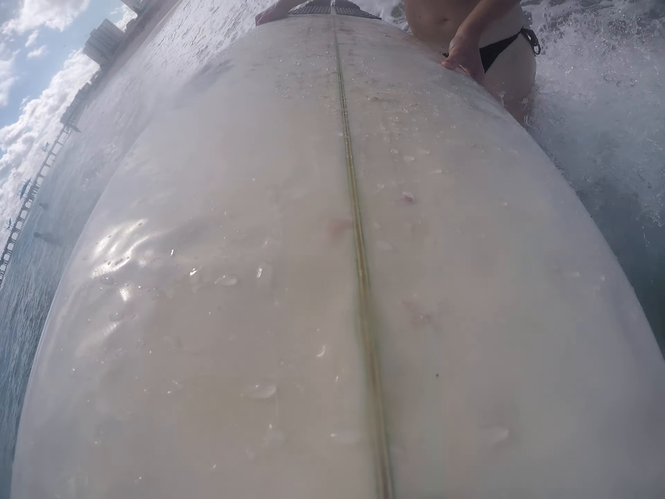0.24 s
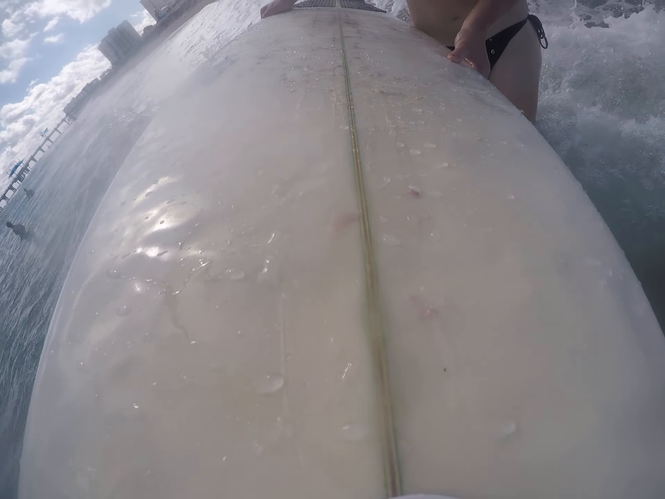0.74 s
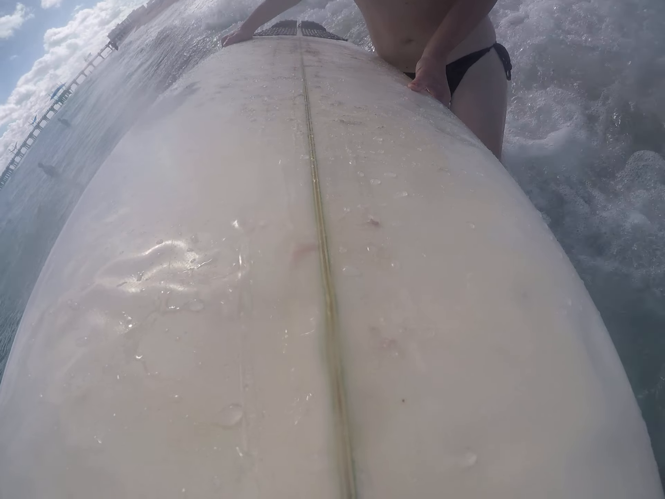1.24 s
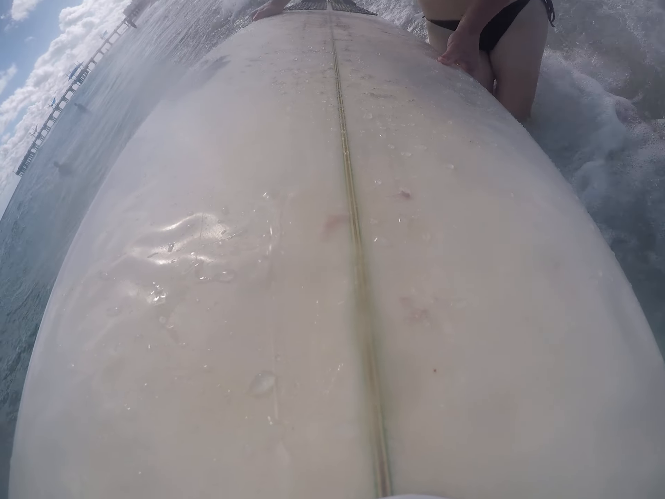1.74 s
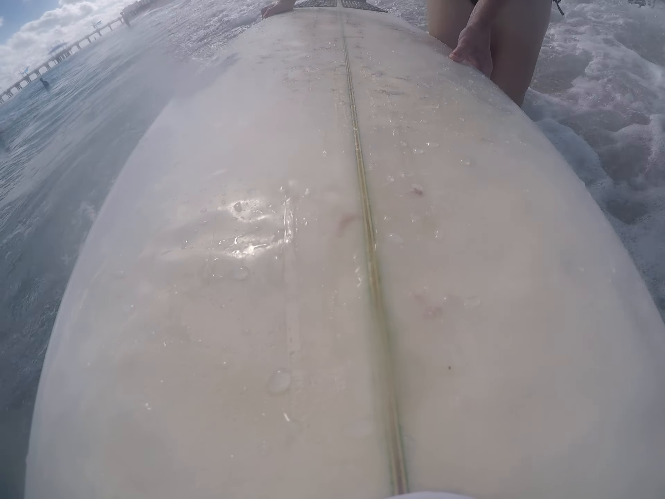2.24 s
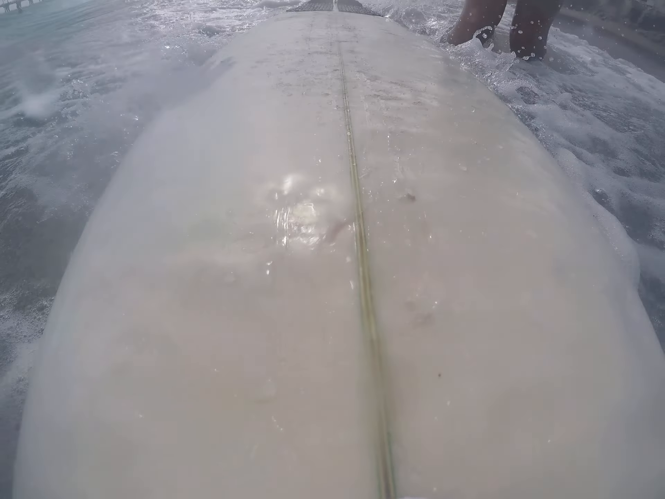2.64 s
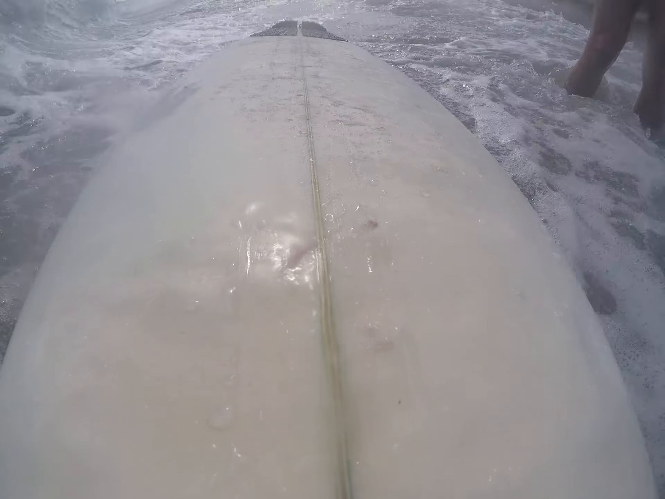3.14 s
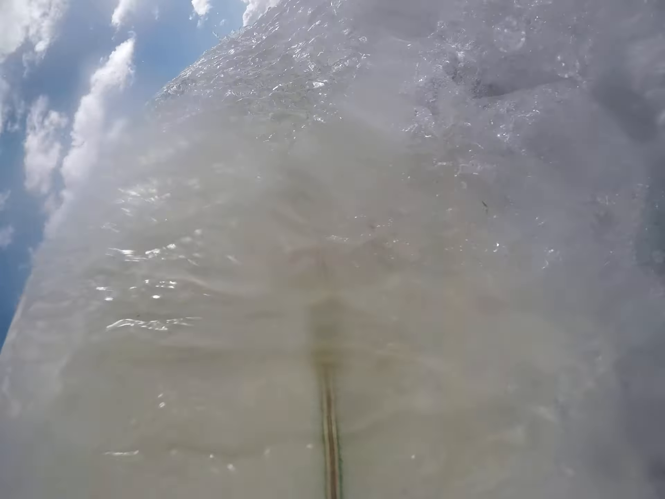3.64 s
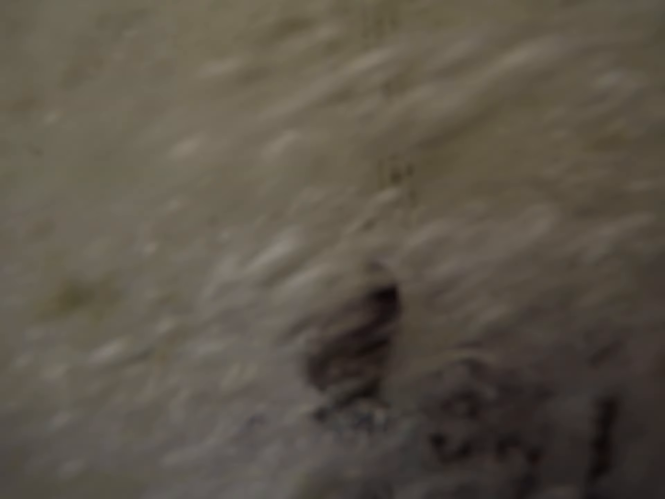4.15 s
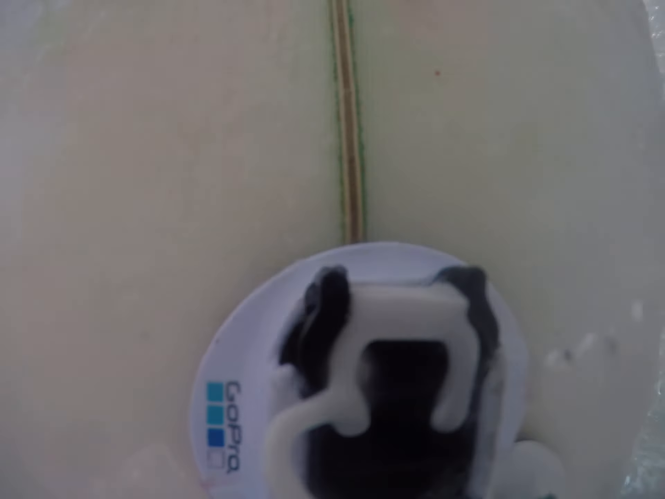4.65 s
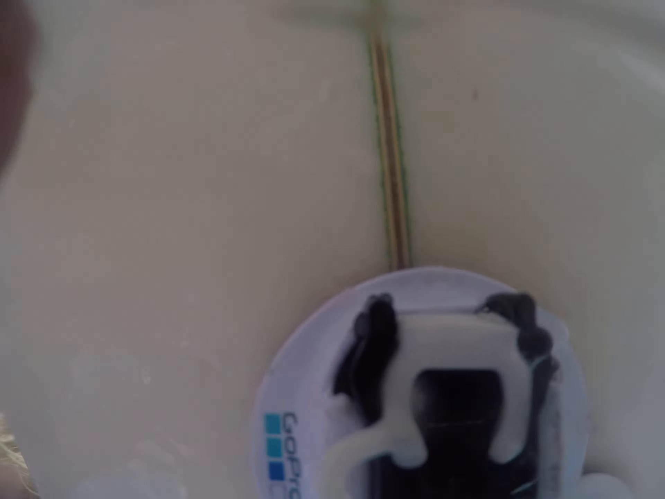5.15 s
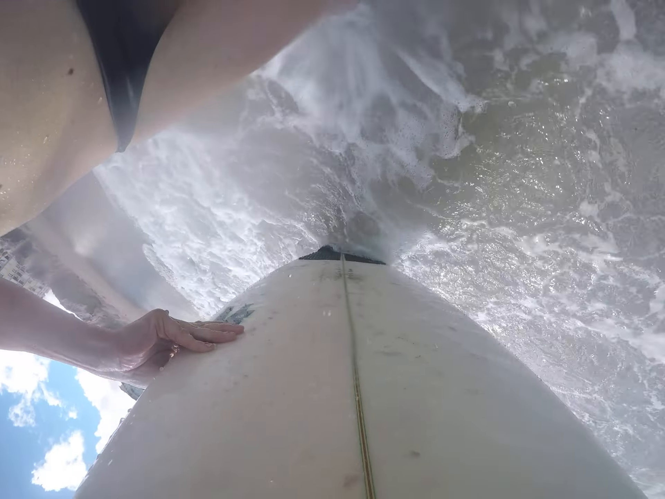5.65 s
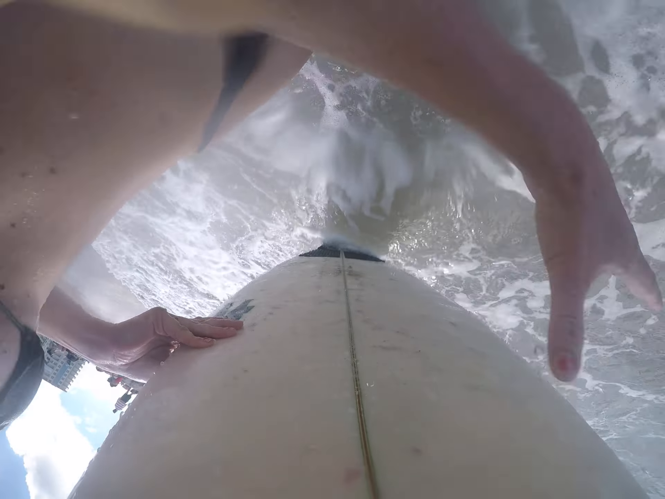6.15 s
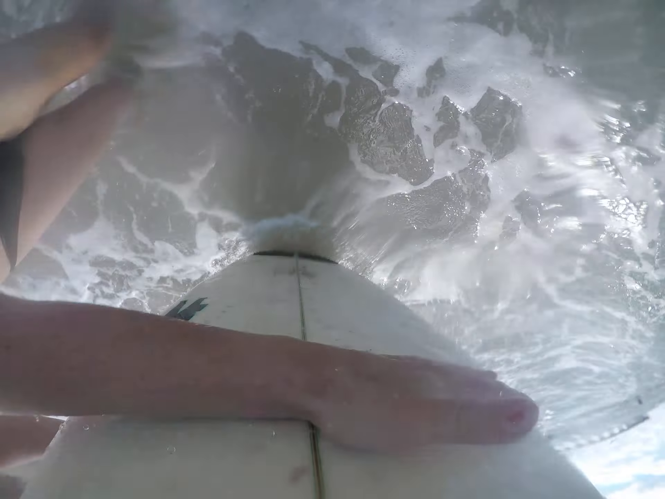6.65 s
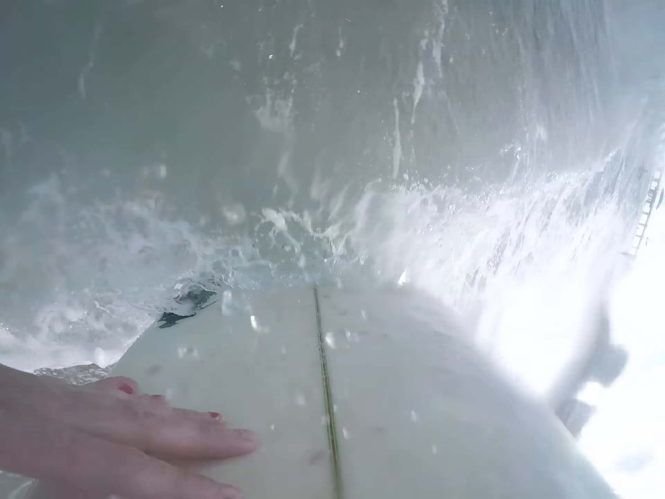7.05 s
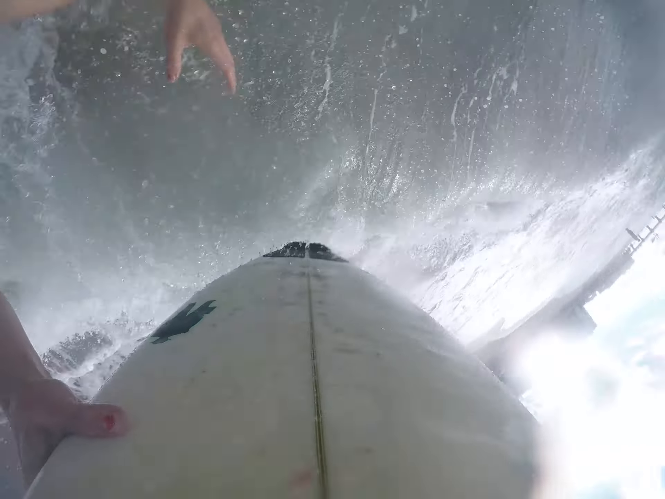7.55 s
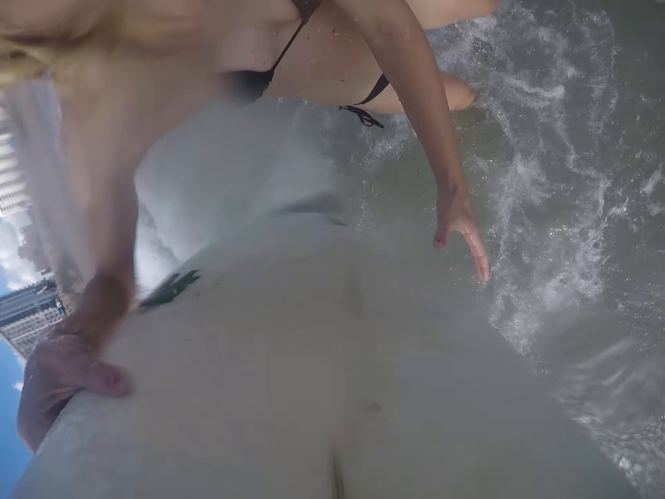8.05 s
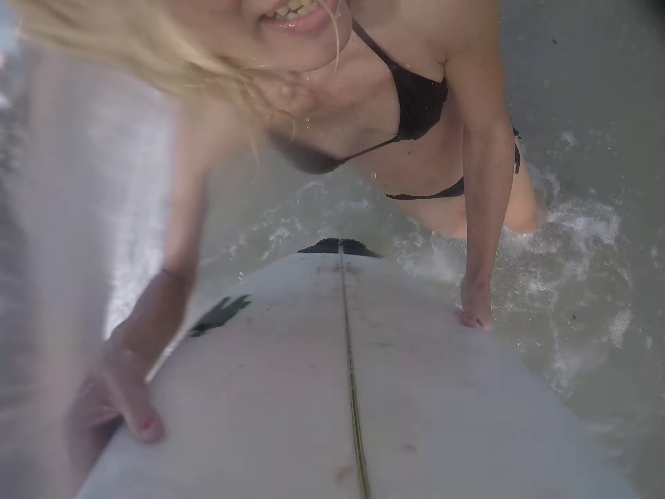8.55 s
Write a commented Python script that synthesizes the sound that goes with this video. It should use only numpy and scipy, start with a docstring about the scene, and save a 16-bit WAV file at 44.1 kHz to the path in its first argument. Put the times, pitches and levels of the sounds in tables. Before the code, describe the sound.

Muffled surf and a deep surfboard rumble, with water slapping, bubbling and hands rubbing, heard through a sealed camera housing.

```python
"""Surfboard in the shore break

A camera in a sealed housing rides on a surfboard and hears mostly structure-borne sound. The board
flexes and rings low, water slaps and hands rub it into the housing's resonances, the mount creaks and
bubbles pop. Surf hisses faintly through the shell, and a wide wash dies away at the start."""
import sys
import numpy as np
from scipy import signal
from scipy.fft import rfft, irfft, next_fast_len
from scipy.io import wavfile
from scipy.ndimage import uniform_filter1d, minimum_filter1d

SR = 44100
rng = np.random.default_rng(int(sys.argv[2]) if len(sys.argv) > 2 else 0)


def to_wav(s):
    """Save 16-bit WAV."""
    ch = np.atleast_2d(s).T  # columns
    pcm = np.round(np.clip(ch, -1, 1) * 32767)  # PCM
    wavfile.write(sys.argv[1], SR, pcm.astype(np.int16))


N = 387638

# off-centre shoves that twist the board: peak t/s, f/Hz, level/dB, decay/(dB/s)
TWIST_SHOVES = [(0.0, 71.3, -25, 65), (1.12, 59, -22.5, 82), (1.63, 50.25, -32, 5),
                (2.36, 53.14, -16.5, 39), (2.6, 70.5, -20, 57), (3.62, 51.03, -19, 38.5),
                (4.25, 63.1, -24.5, 110.5), (4.68, 45.65, -15, 26.5), (5.06, 40.53, -10.5, 143.5),
                (5.3, 39.67, -20.5, 95), (5.51, 45.15, -30.5, 16.5), (6.29, 46.38, -16.5, 11),
                (6.65, 42, -13, 8), (6.99, 50.56, -15, 12.5), (7.3, 44.16, -14, 19.5),
                (7.64, 53.34, -13.5, 33), (8.04, 46.67, -18, -0.5), (8.38, 46.2, -17.5, 33),
                (8.76, 50.56, -8.5, 20)]
# higher board modes, selected by water load and grip: peak t/s, f/Hz, level/dB, decay/(dB/s)
RING_SHOVES = [(0.1, 179, -26.5, 60), (0.66, 115.5, -30, 149.5), (1.09, 119.4, -17.5, 86),
               (2.13, 113.8, -33, 77), (2.308, 184.4, -7.5, 78), (2.375, 187, -9, 111),
               (2.53, 111.5, -18, 91), (3.35, 95.1, -14.5, 303), (3.52, 122.9, -22, 190),
               (3.7, 141.6, -15, 61.5), (3.8, 100, -19.5, 172), (4.12, 98.9, -31, 25),
               (4.36, 93.5, -14, 202), (4.635, 138, -17, 48), (4.76, 123.9, -18, 30.5),
               (5.03, 89.7, -16.5, 94), (6.32, 104.3, -16, 63), (6.6, 92.7, -23.5, 6),
               (7.06, 114.6, -20, 52.5), (7.42, 100.3, -29, 2.5), (7.63, 119.4, -20, 13.5),
               (7.98, 120.1, -20, 30), (8.22, 87.63, -21, 80.5), (8.45, 106.9, -14, 41),
               (8.69, 116.6, -24.5, -6)]
# modes of the plastic mount and its buckle: f/Hz, level/dB, T60/s
MOUNT_MODES = [(2700, -3.5, 0.0028), (3240, -6.5, 0.011), (4480, -1.5, 0.0073), (4940, 1, 0.0075),
               (5600, 4, 0.0024)]
BUCKLE_MODES = [(6750, 5, 0.0029), (7790, 1.2, 0.011), (8290, 1.5, 0.0024)]
# water and hands dragging on the deck: t/s, length/s, level/dB, relative creak/dB, relative boom/dB
DRAGS = [(2.29, 0.063, -23, -18, 7.5), (2.504, 0.094, -21.5, -21, 2.5), (2.615, 0.041, -28.5, -8.5, -27),
         (3.334, 0.031, -17, -15, 3.5), (3.382, 0.12, -30.5, -10.5, 0.5), (3.512, 0.29, -41, -10.5, 9.5),
         (3.795, 0.044, -30, -8.5, 9.5), (3.859, 0.026, -26, -1.5, -1), (3.919, 0.014, -33, -4.5, 0),
         (4.016, 0.19, -38, -9, 1.5), (4.245, 0.092, -35, -6, 2.5), (4.622, 0.12, -39.5, -33, 3.5),
         (4.745, 0.21, -50, -27, -12.5), (5.001, 0.015, -22.5, -12, 9.5), (5.044, 0.032, -24, -9.5, -3),
         (5.127, 0.043, -22.5, -10, -9), (5.23, 0.043, -30.5, -6.5, 3), (5.29, 0.097, -39, -10, -1),
         (5.397, 0.13, -36.5, -18.5, -0.5), (5.621, 0.011, -27.5, -3, -5), (5.671, 0.22, -54, -35, 3),
         (5.856, 0.41, -45.5, -35, -3), (6.262, .03, -28, -28, -13), (6.299, 0.046, -15, -25, -1.5),
         (6.374, 0.095, -14.5, -28.5, 1.5), (6.599, 0.034, -35.5, -36, 13.5),
         (6.634, 0.013, -14, -20.5, -1), (6.752, 0.028, -23.5, -17.5, -6), (6.85, 0.057, -32.5, -18.5, -4),
         (6.948, 0.14, -17.5, -27.5, -10), (7.08, 0.14, -23.5, -18.5, -7.5), (7.22, 0.25, -34, -22, -25),
         (7.439, 0.18, -20.5, -29, -6), (7.573, .19, -19, -28.5, -4), (7.814, 0.059, -29.5, -24.5, -31),
         (7.868, 0.064, -36.5, -23, -15), (7.964, 0.077, -26, -32, -28), (8.055, 0.12, -19.5, -32, -17),
         (8.185, 0.06, -16, -20, -8.5), (8.271, 0.028, -31, -15, -2), (8.312, 0.06, -29.5, -30, 0),
         (8.381, 0.1, -18.5, -23, -3.5), (8.493, 0.047, -15, -18, -9), (8.534, 0.031, -14.5, -21.5, -3),
         (8.591, .02, -24.5, -14, 2.5), (8.649, 0.039, -26, -25, 8), (8.701, 0.12, -27, -13, -1)]
# bubbling while the board is under water: t/s, level/dB
UNDERWATER = [(3.299, -51), (3.45, -50), (3.9, -48), (4.02, -52), (4.052, -27.5), (4.322, -35),
              (4.451, -52.5), (4.95, -51), (5.03, -41), (5.299, -52)]

TWIST_RISE_DB_S, RING_RISE_DB_S, DRAG_RISE_DB_S, DRAG_FALL_DB_S = 197, 700, 1488.5, 799
DIVE_S, SURFACE_S = UNDERWATER[0][0], UNDERWATER[-1][0]
LIFTED_S = 5.7  # the board leaves the water


def undb(db):
    """Amplitude ratio of a level in decibels."""
    return 10 ** (np.asarray(db) / 20)


def unit(x):
    """Normalisation to rms 1."""
    return x / np.sqrt(np.mean(x ** 2))


def curves(table):
    """Linear interpolation of each column over time, one value a sample."""
    times, *columns = np.transpose(table)
    return [np.interp(np.arange(N) / SR, times, column) for column in columns]


def walk(rate):
    """Slow random modulation: levels held 1 / rate s and smoothed twice; rms 1."""
    hold = int(SR / rate)
    steps = np.repeat(rng.standard_normal(N // hold + 1), hold)
    return unit(uniform_filter1d(uniform_filter1d(steps, hold), hold)[:N])


def coloured(spectrum):
    """Spectral shaping of white noise; rms 1."""
    hz, db = np.transpose(spectrum)
    size = next_fast_len(N)
    gain = undb(np.interp(np.log(np.fft.rfftfreq(size, 1 / SR) + 1), np.log(hz), db))
    return unit(irfft(rfft(rng.standard_normal(size)) * gain, size)[:N])


def response(modes):
    """Modal superposition: an impulse response of damped sinusoids; energy 1."""
    t = np.arange(SR // 2) / SR
    ring = sum((-1) ** k * undb(db) / np.sqrt(t60) * np.sin(2 * np.pi * hz * t) * 1000. ** (-t / t60)
               for k, (hz, db, t60) in enumerate(modes))
    return ring / np.sqrt(np.sum(ring ** 2))


def excite(force, modes):
    """Forced vibration: the force convolved with the impulse response."""
    return signal.oaconvolve(force, response(modes))[:N]


def grit(rate, spread_db):
    """Shot noise: a Poisson train of slips of uneven size; rms 1."""
    slips = (rng.random(N) < rate / SR) * rng.standard_normal(N)
    return unit(slips * undb(spread_db * np.minimum(rng.exponential(size=N), 3)))


def judder(rate, decay_s, rest):
    """Stick-slip envelope: jolts at uneven gaps relax to a resting level; rms 1."""
    gaps, sizes = rng.random((N * rate // SR * 2, 2)).T
    at = np.cumsum((.4 + 1.2 * gaps) * SR / rate).astype(int)
    jolts = np.zeros(N)
    jolts[at[at < N]] = (0.051 + sizes)[at < N]
    return unit(rest + signal.lfilter([1], [1, -np.exp(-1 / (decay_s * SR))], jolts))


def strikes(table, modes, decay_s, ring_s):
    """Impact excitation: a noise burst for each row rings the modes, peaking at the row's level."""
    out, ring = np.zeros(N + SR), response(modes)[:int(ring_s * SR)]
    fade = np.exp(-np.arange(int(6 * decay_s * SR)) / (decay_s * SR))
    for (s, db), push in zip(table, rng.standard_normal((len(table), len(fade)))):
        hit = signal.oaconvolve(push * fade, ring)
        out[int(s * SR):int(s * SR) + len(hit)] += undb(db) * hit / np.abs(hit).max()
    return out[:N]


def strongest(s, length, db, rise_db_s, fall_db_s):
    """Upper envelope of events that rise, hold and decay: its level and the dominant row."""
    grid = np.arange(N * 1000 // SR + 2) / 1000
    s, length, db, fall_db_s = (np.reshape(v, (-1, 1)) for v in (s, length, db, fall_db_s))
    before, after = np.maximum(s - grid, 0), np.maximum(grid - s - length, 0)
    level = db - rise_db_s * before - np.abs(fall_db_s) * after
    t = np.arange(N) / SR
    return np.interp(t, grid, level.max(0)), level.argmax(0)[(t * 1000).astype(int)]


def shoved(table, rise_db_s):
    """Frequency and level of a mode, both set by the dominant shove."""
    s, hz, db, fall_db_s = np.transpose(table)
    level, row = strongest(s, 0, db, rise_db_s, fall_db_s)
    return hz[row], level


def board_mode(hz, db, waver, octave_db):
    """Asymmetric oscillation: the lopsided swing adds an octave to a wavering sine."""
    phase = 2 * np.pi * np.cumsum(hz * (1 + waver * walk(11))) / SR
    return np.sqrt(2) * undb(db) * (np.sin(phase) + undb(octave_db) * np.cos(2 * phase))


def flexing():
    """Flexural vibration: each shove sets the whole board bending."""
    # shoves: peak t/s, f/Hz, level/dB, decay/(dB/s)
    shoves = [(0.0, 30.1, -25.5, 1.5), (0.75, 28.42, -19.5, 3), (1.15, 27.63, -11, 9.5),
              (2.2, 27.35, -11, 86.5), (2.64, 27.85, -12.5, 10), (3.47, 27.63, -9, 33),
              (3.62, 27.4, -10.5, 35), (3.79, 25.6, -15, 202), (4.09, 21.57, -12.5, 130.5),
              (4.27, 24.3, -23, 195), (4.45, 31.6, -30.5, 45), (4.9, 34.6, -19.5, 156),
              (5.07, 34.3, -17.5, 50), (5.63, 31, -29, 27.5), (6.31, 28.98, -18.5, 26),
              (6.8, 25.42, -17, 38), (7.25, 25.06, -12, 12), (7.72, 25.09, -10.5, 8.5),
              (8.49, 27.48, -10.5, 50), (8.72, 28.6, -11, 64)]
    return board_mode(*shoved(shoves, rise_db_s=88.5), waver=0.0085, octave_db=-18.5)


def twisting():
    """Torsional vibration: shoves off centre twist the board."""
    return board_mode(*shoved(TWIST_SHOVES, TWIST_RISE_DB_S), waver=0.02942, octave_db=-10.5)


def buffeting():
    """Broadband forcing: chop shakes the board between its modes, in step with their level."""
    twist_db = shoved(TWIST_SHOVES, TWIST_RISE_DB_S)[1]
    ring_db = shoved(RING_SHOVES, RING_RISE_DB_S)[1]
    band = signal.butter(2, [30, 190], "bandpass", fs=SR, output="sos")
    shake = unit(signal.sosfilt(band, rng.standard_normal(N)))
    return shake * undb(np.maximum(twist_db, ring_db) - 20 + 6.6 * walk(12))


def surf():
    """Transmission through the shell: a muffled roar, the hollow board resonating, and thin spray."""
    # surf: t/s, level/dB, relative spray/dB
    swells = [(0.0, -29, -37), (0.3, -19.5, -35.5), (.9, -20, -31.5), (1.3, -23.5, -29), (2.27, -24.5, -30),
              (2.45, -33.5, -24.5), (2.74, -53.5, -21), (3.33, -42.5, -27), (3.52, -23, -35),
              (4.11, -32, -30), (4.55, -38, -33.5), (4.95, -47, -29.5), (5.29, -37, -44), (5.73, -46, -25),
              (6.29, -45, -14.5), (6.49, -26, -37), (6.71, -26, -34), (7.46, -51.5, -20), (7.61, -26, -41),
              (7.81, -40, -20), (8.72, -39, -22), (8.79, -43, -34.5)]
    # spectral densities: f/Hz, level/dB
    roar_spectrum = [(35, -28.5), (60, -1.5), (182, -9.5), (323, -37.5), (378, -11), (682, -20.5),
                     (1130, -20.5), (1510, -29), (3800, -61.5), (4940, -81), (8360, -120)]
    spray_spectrum = [(1470, -11), (3010, -10), (3740, -18), (4450, -10.5), (6470, -15), (7100, -18.5),
                      (9170, -15), (11900, -25.5), (14500, -33.5), (20200, -120)]
    # hollow board: f/Hz, level/dB, T60/s
    hollow_modes = [(183, -3.5, 0.1), (381, 6, 0.25), (569, -3.5, 0.087), (941, -8, 0.088),
                    (1121, -1.5, 0.08), (1352, -9, 0.063)]
    db, spray_db = curves(swells)
    roar = coloured(roar_spectrum) * undb(walk(5.7))
    hum = undb(-1.5) * excite(grit(900, 0.6), hollow_modes)
    spray = coloured(spray_spectrum) * undb(db + spray_db + walk(27))
    return (roar + hum) * undb(db - 11.5) + spray


def wash():
    """Antiphase between the ears widens a rush that fades in the first second."""
    # fade: t/s, level/dB
    fade = [(0, -13), (.5, -22), (.85, -38), (1.1, -42), (1.6, -90)]
    # spectral densities: f/Hz, level/dB
    side_spectrum = [(30, -1), (80, -27.5), (112, -5), (149, -13), (214, 3.5), (272, -36), (371, -1.5),
                     (531, -4.5), (628, -9), (742, -5.5), (1420, -31.5), (1840, -25), (3440, -47),
                     (9170, -61), (20200, -120)]
    centre_spectrum = [(82, -33.5), (140, -11.5), (182, 3), (272, -27.5), (373, -0.5), (485, -17.5),
                       (558, 3.5), (653, -17.5), (1340, -15.5), (1900, -25.5), (2500, -22.5), (3600, -34),
                       (9170, -43), (20200, -120)]
    db, = curves(fade)
    sides = undb(walk(14)) * coloured(side_spectrum) * np.array([[.85], [-1.15]])
    return undb(db) * (sides + undb(-12) * coloured(centre_spectrum))


def ringing():
    """Amplitude modulation: chop makes the board's higher modes flutter."""
    hz, db = shoved(RING_SHOVES, RING_RISE_DB_S)
    return board_mode(hz, db + 4 * walk(25), waver=0.0191, octave_db=-23)


def plops():
    """Air-pocket resonance: each pocket swells and dies away at one frequency."""
    # pockets: t/s, peak level/dB, f/Hz, length/cycles
    pockets = [(.091, -24.5, 2780, 5), (2.295, -12, 466, 4.6), (2.34, -19.5, 1138, 13),
               (2.512, -17, 1360, 14), (2.607, -12.5, 1246, 8), (2.58, -18, 404, 6.4),
               (2.684, -25, 580, 5.6), (3.473, -22, 1093, 6.2), (4.09, -22, 457.5, 3),
               (4.186, -22, 1237, 3.7), (4.301, -17, 434, 1.3), (4.715, -19, 559, 5.4),
               (4.92, -29, 452, 5.7), (5.005, -15.5, 418.2, 5.9), (5.04, -20, 497, 3.3),
               (5.08, -21, 444, 4.8), (5.15, -25, 1224, 10.15), (6.972, -9, 1013, 3.7),
               (7.114, -10.5, 780, 3.7), (7.186, -9.5, 992, 5), (7.53, -17.5, 990, 33),
               (7.608, -10.5, 790, 4.6), (7.655, -11.5, 783, 5.4), (7.702, -15, 992.4, 18),
               (8.128, -13.5, 1050, 17.8), (8.207, -11.5, 1061, 14), (8.424, -9, 1038, 17.5),
               (8.6, -13, 1049, 7.9)]
    out = np.zeros(N + SR)
    for s, db, hz, length in pockets:
        cycles = np.arange(int(6 * length * SR / hz)) * hz / SR
        swell = np.e * 2 * cycles / length * np.exp(-2 * cycles / length)
        out[int(s * SR):int(s * SR) + len(cycles)] += undb(db) * swell * np.sin(2 * np.pi * cycles)
    return out[:N]


def snaps():
    """Impulse excitation of heavily damped plastic: mount and buckle tick."""
    # snaps of the whole mount, and thinner ones of the buckle alone: t/s, peak level/dB
    mount_ticks = [(0.0933, -25.5), (2.577, -26), (2.6144, -19), (3.8098, -14.5), (3.8601, -21),
                   (3.873, -8.5), (5.003, -32), (5.0824, -24.5), (5.2376, -33), (5.2653, -26),
                   (5.5083, -29.5), (6.6789, -23.5), (6.7645, -12), (7.0953, -21), (7.1826, -21.5),
                   (7.221, -25.5), (8.5074, -21)]
    buckle_ticks = [(3.3818, -27), (3.4277, -25), (3.4806, -33), (3.503, -24.5), (3.5384, -20.5),
                    (3.679, -30.5), (3.7484, -31), (4.0548, -34), (4.0732, -28.5), (4.114, -35),
                    (4.6329, -49), (4.7671, -39), (5.4456, -35)]
    return (strikes(mount_ticks, MOUNT_MODES + BUCKLE_MODES, decay_s=0.001, ring_s=.02)
            + strikes(buckle_ticks, BUCKLE_MODES, decay_s=0.00061, ring_s=.02))


def thumps():
    """Transient and free decay: a knock swings heavily, then low modes ring on unless submerged."""
    # knocks of waves and knees: t/s, level/dB, f/Hz
    knocks = [(1.029, -14, 53.6), (1.062, -11, 111.5), (1.414, -12, 116), (2.119, -20, 61.8),
              (2.507, -5.5, 52.08), (2.584, -8, 177), (3.337, -7.5, 91.2), (3.801, -4.5, 63),
              (3.806, -3, 377), (3.869, -1, 218), (3.923, -9.5, 77.5), (4.037, -8.5, 76), (4.227, -8.5, 70),
              (4.234, -19.5, 418), (4.312, -14.5, 406), (4.622, -12, 112.9), (4.993, -3.5, 67.3),
              (6.638, -4.5, 293), (6.756, -11.5, 51.26), (6.973, -5, 65.5), (7.08, -11, 71.65),
              (7.085, -5, 250), (8.555, -7, 292), (8.22, -6, 90.3), (8.417, -9.5, 140)]
    # board: f/Hz, level/dB, T60/s
    low_modes = [(58.5, -5, 1), (118.3, -6.5, 0.57)]
    swings, pushes = np.zeros(N), np.zeros(N)
    for s, db, hz in knocks:
        at = int(s * SR)
        cycles = np.arange(int(5 * SR / hz)) * hz / SR
        swing = 3.4 * cycles * np.exp(-cycles / .8) * np.sin(2 * np.pi * cycles)
        swings[at:at + len(swing)] += undb(db) * swing
        if not DIVE_S < s < SURFACE_S:
            pushes[at] = undb(db - 7)
    soft = signal.windows.hann(int(0.007 * SR))
    tails = signal.oaconvolve(excite(pushes, low_modes), soft / soft.sum())[:N]
    return swings + tails / np.abs(response(low_modes)).max()


def housing(ring):
    """Housing resonance: ring(modes) sounds three groups; grip and water load weight the outer two."""
    # mode groups: f/Hz, level/dB, T60/s
    low_modes = [(442, -1.5, 0.079), (488.4, 2.5, 0.065), (551, 7, 0.032), (764, 4.5, 0.033)]
    mid_modes = [(901, 6.5, 0.049), (1015, 10, 0.022), (1161, 8.5, 0.039), (1246, 9, 0.034),
                 (1370.5, 4.5, 0.02)]
    high_modes = [(1672, 4, 0.008), (2270, -6, 0.0063), (2570, -15.5, 0.01), (3066, -17, 0.02)]
    # effect of the load: t/s, low-mode level/dB, high-mode level/dB
    loading = [(2.3, 1, -15), (2.6, -3.5, -11.5), (3.3, -8, -16.5), (3.8, -1, -8), (4.3, -7.5, -9),
               (4.62, 6.5, -14.5), (4.96, 9.5, -28), (5.05, -11, -10), (5.62, -6.5, -9), (6.3, -2.5, -17.5),
               (6.7, -5.5, -13), (6.95, -7.5, -16.5), (7.6, -3.5, -17), (7.8, -5.5, -22.5),
               (8.5, -4.5, -20.5), (8.75, -6.5, -13.5)]
    low_db, high_db = curves(loading)
    return ring(mid_modes) + undb(low_db) * ring(low_modes) + undb(high_db) * ring(high_modes)


def deck(force):
    """Boundary conditions: the deck has other, shorter-lived modes afloat than when held."""
    # deck: f/Hz, level/dB, T60/s
    afloat_modes = [(166, 1, 0.029), (374.2, -0.68, 0.078), (422, -1.7, 0.011)]
    held_modes = [(177.74, 1.5, 0.28), (253.3, 0, 0.17), (287.7, 8, 0.13), (317.95, 7.5, 0.21),
                  (445, 0, 0.18)]
    afloat = np.arange(N) < LIFTED_S * SR
    return excite(force * afloat, afloat_modes) + excite(force * ~afloat, held_modes)


def rubbing():
    """Friction: slips ring housing and deck; mount and buckle hiss when wet and tick when strained."""
    s, length, db, creak_db, boom_db = np.transpose(DRAGS)
    db, row = strongest(s, length, db, DRAG_RISE_DB_S, DRAG_FALL_DB_S)
    creak_db, boom_db = creak_db[row], boom_db[row]
    grip = judder(rate=45, decay_s=.011, rest=.25)
    slips = grit(1300, 2.5) * grip * undb(db - 2.5)
    rub = housing(lambda modes: excite(slips, modes))
    boom = deck(grit(1500, 1.5) * undb(db + boom_db + 1.8 * walk(50)))
    # the mount is strained most when carried by hand
    strain = np.clip((creak_db + 34) / 14, 0, 1) * np.where(np.arange(N) < LIFTED_S * SR, .6, .95)
    ticks = judder(rate=140, decay_s=.0012, rest=.06) * undb(2.5 * walk(60))
    force = (strain * ticks + (1 - strain) * grip) * undb(db + creak_db - 8.5)
    creak = sum(excite(force * rng.standard_normal(N) * undb(4.2 * walk(40)), modes)
                for modes in (MOUNT_MODES, BUCKLE_MODES))
    return rub + boom + creak


def glugs(db, first_s, last_s, low_hz, pitch_ratio, count):
    """Damped oscillation of random bubbles, each a few cycles of slightly rising pitch."""
    out = np.zeros(N + SR)
    for when, pitch, size in rng.random((count, 3)):
        at = int((first_s + when * (last_s - first_s)) * SR)
        hz = low_hz * pitch_ratio ** pitch
        cycles = np.arange(int(10 * SR / hz)) * hz / SR
        swell = cycles * np.exp(-cycles / 1.6)
        chirp = np.sin(2 * np.pi * cycles * (1 + .006 * cycles))
        out[at:at + len(cycles)] += undb(db[at] + 12 * size) * swell * chirp
    return out[:N]


def bubbles():
    """Bubble resonance: low glugs round the submerged housing, higher gurgles with each drag."""
    s, length, db = np.transpose(DRAGS)[:3]
    gurgle_db = strongest(s, length, db, DRAG_RISE_DB_S, DRAG_FALL_DB_S)[0] - 3.5
    drowned = glugs(curves(UNDERWATER)[0], DIVE_S, SURFACE_S, low_hz=126.6, pitch_ratio=5.3, count=80)
    return drowned + glugs(gurgle_db, 0, (N - 1) / SR, low_hz=726, pitch_ratio=1.74, count=350)


def slaps():
    """Impact excitation: each slap cracks in the housing's modes."""
    # slaps and jolts: t/s, level/dB
    hits = [(2.294, -12), (2.504, -10), (2.684, -19), (3.329, -11.5), (3.344, -1), (3.471, -13.5),
            (3.804, -8), (3.872, -5), (4.716, -23), (5.001, -11.5), (5.049, -13), (5.073, -8.5),
            (5.62, -17.5), (5.63, -21.5), (6.262, -18.5), (6.305, -1), (6.382, -8), (6.6, -21.5),
            (6.632, -3), (6.759, -2), (6.951, -6.5), (7.074, -10.5), (7.441, -10.5), (7.654, -17),
            (7.702, -9.5), (7.819, -11), (7.852, -17), (7.933, -21), (8.053, -12), (8.207, -8), (8.229, -9),
            (8.378, -6), (8.421, -6.5), (8.602, -17), (8.657, -9.5)]
    return undb(-4.5) * housing(lambda modes: strikes(hits, modes, decay_s=0.0042, ring_s=.12))


def fizz():
    """Incoherent summation: countless tiny bursting bubbles merge into a narrow hiss."""
    # foam on the shell: t/s, length/s, level/dB
    foam = [(3.403, .42, -54.5), (4.02, 0.31, -58.5), (7.447, .35, -59)]
    # resonances of the hiss: f/Hz, level/dB, T60/s
    hiss_modes = [(6067, 0.5, 0.0056), (2840, -10.5, 0.0079)]
    db = strongest(*np.transpose(foam), rise_db_s=200.5, fall_db_s=200.5)[0]
    return excite(rng.standard_normal(N) * undb(db), hiss_modes)


def squeaks():
    """Stick-slip oscillation: a lopsided wave with uneven periods, dulled by the board."""
    # wet skin skidding on wax: t/s, length/s, start f/Hz, end f/Hz, level/dB, relative pitch jitter
    skids = [(5.124, 0.029, 866, 867, -15, 0.03), (5.153, 0.024, 679, 495, -20, 0.01),
             (5.407, 0.087, 239, 272, -33.5, 0.03), (5.463, 0.063, 261.6, 243, -31.5, 0.06)]
    out, wobble = np.zeros(N), walk(350)
    for s, length, start_hz, end_hz, db, jitter in skids:
        at, size = int(s * SR), int(length * SR)
        hz = np.linspace(start_hz, end_hz, size) * (1 + jitter * wobble[at:at + size])
        phase = 2 * np.pi * np.cumsum(hz) / SR
        wave = sum(undb(-2.5 * k) * np.sin((k + 1) * phase) for k in range(10))
        out[at:at + size] += undb(db) * wave * np.sin(np.linspace(0, np.pi, size)) ** 0.79
    return signal.sosfilt(signal.butter(5, [380, 1900], "bandpass", fs=SR, output="sos"), out)


def scene():
    """Superposition: all but the wash reaches both channels alike."""
    board = flexing() + twisting() + ringing() + buffeting() + thumps()
    contact = rubbing() + slaps() + snaps() + squeaks() + bubbles() + plops() + fizz()
    shell = signal.butter(4, 8800, fs=SR, output="sos")  # the sealed shell passes little high treble
    return board + signal.sosfilt(shell, contact) + surf() + wash()


def record(dry):
    """Look-ahead limiting eases the gain down around the loudest peaks; a low-pass cuts the top."""
    ceiling, window, top_hz = .95, int(.004 * SR), 15500
    gain = np.minimum(1, ceiling / (np.abs(dry).max(0) + 1e-9))
    held = minimum_filter1d(gain, 2 * window)
    eased = uniform_filter1d(uniform_filter1d(held, window), window)
    return signal.sosfilt(signal.ellip(8, .2, 70, top_hz, fs=SR, output="sos"), dry * eased)


dry = scene()
out = record(dry)
to_wav(out)
```